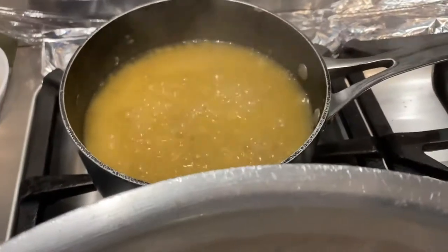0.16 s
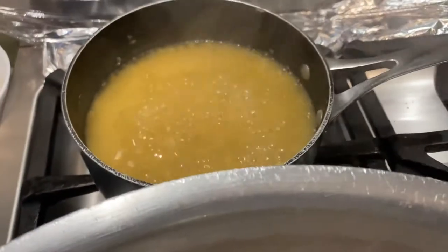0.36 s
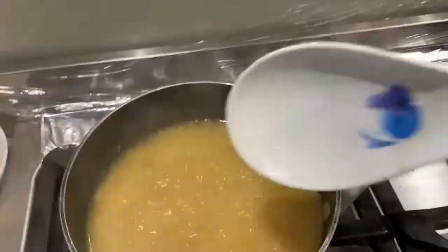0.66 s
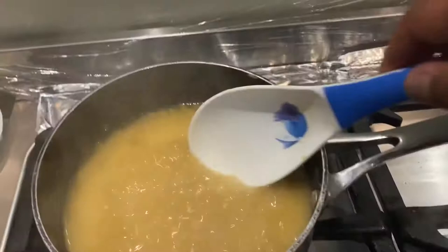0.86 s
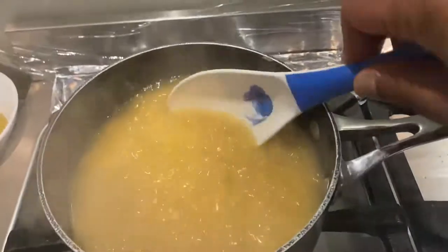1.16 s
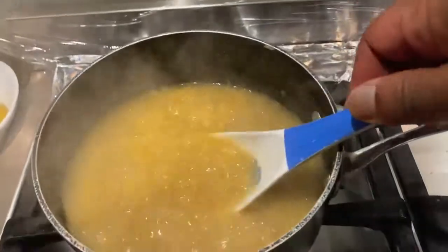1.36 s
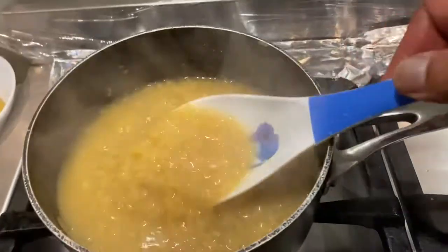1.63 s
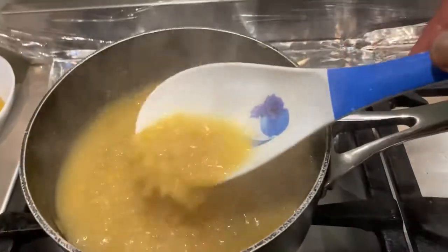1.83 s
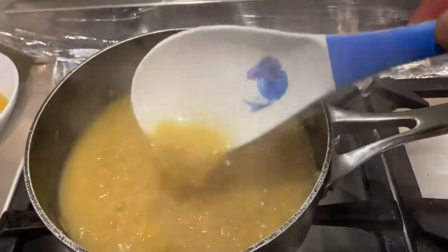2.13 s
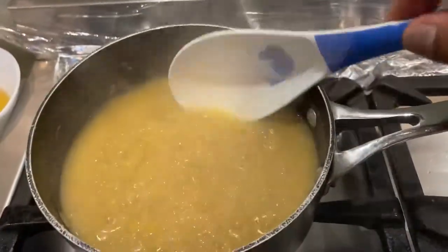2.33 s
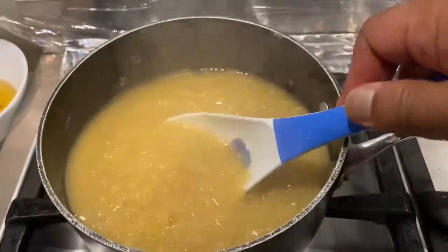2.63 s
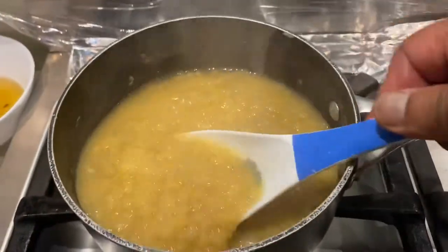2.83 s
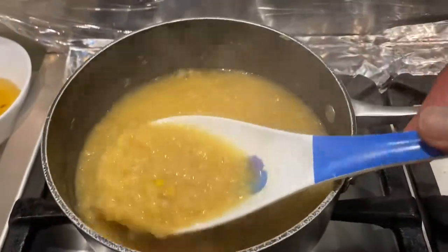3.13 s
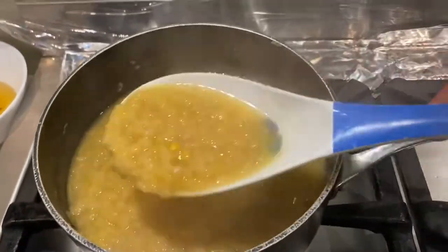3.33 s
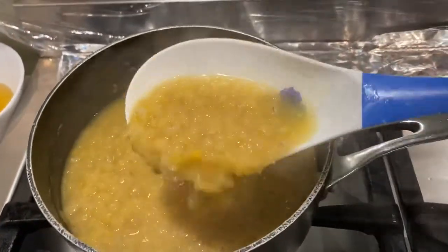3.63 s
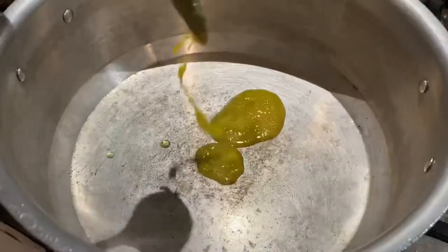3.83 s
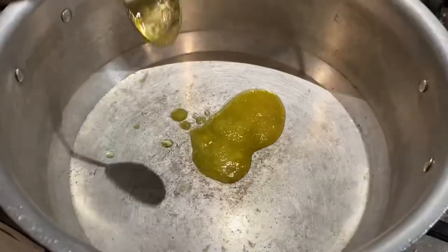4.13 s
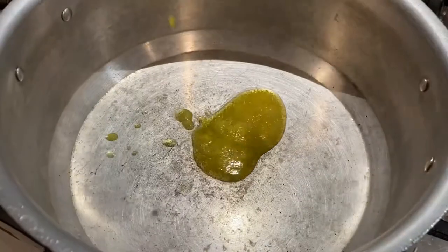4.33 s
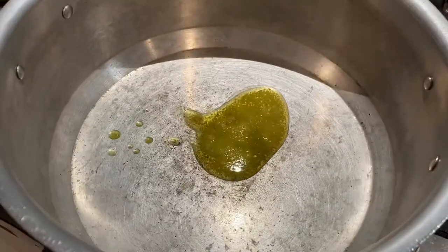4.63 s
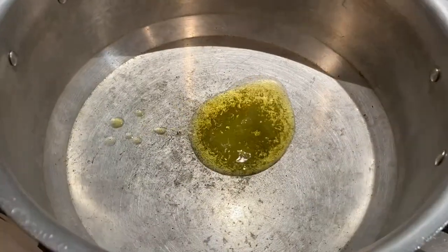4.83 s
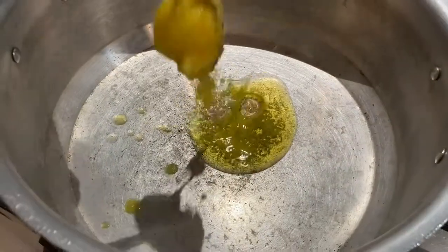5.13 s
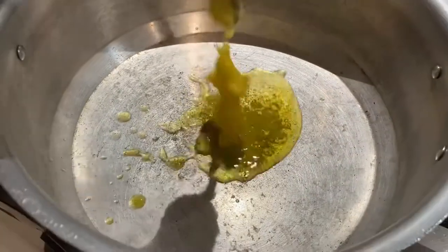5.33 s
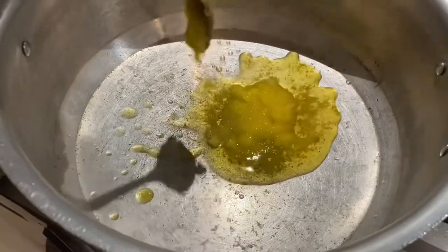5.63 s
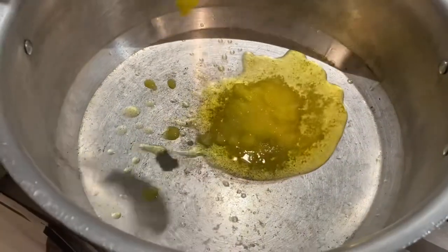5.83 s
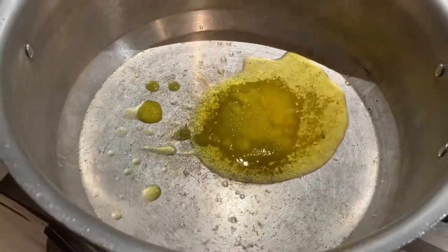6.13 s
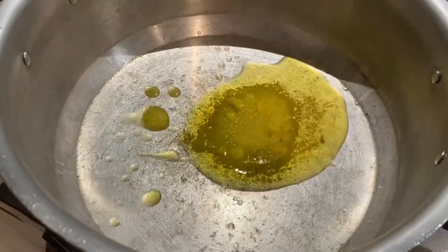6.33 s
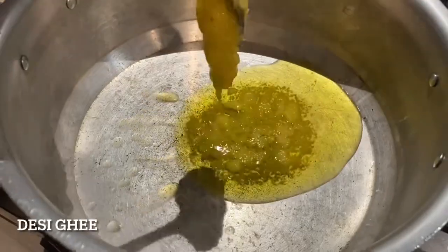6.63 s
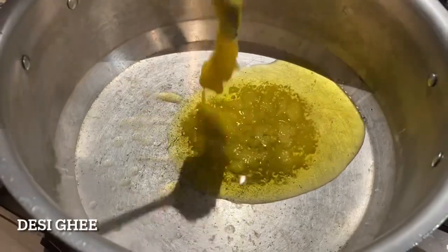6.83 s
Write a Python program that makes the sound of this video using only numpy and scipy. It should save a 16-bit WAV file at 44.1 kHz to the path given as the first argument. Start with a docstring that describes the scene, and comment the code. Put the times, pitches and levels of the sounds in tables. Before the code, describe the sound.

In a home kitchen, close up, a gas flame rumbles low beneath a faintly bubbling pot of lentils. A spoon clacks brightly on the pot, stirs with grainy strokes and short scrapes, and thick soup plops. A hard cut leads to a much drier, brighter scene: ghee melting in a steel pot, with sharp snaps, pitched pops and fine sizzle.

```python
"""In a kitchen, lentils simmer over a rumbling gas burner; a spoon knocks, stirs and scrapes, and thick soup plops.
Then a hard cut leads to a steel pot of melting ghee: dry snaps and pitched pops rattle over a fine sizzle.
Knocks and snaps are coloured impulses, bubbles are short decaying tones, and flame and room are filtered noise.
Pots answer with decaying modes and dense reflections, in two channels that are partly alike."""
import sys
import numpy as np
from scipy import signal
from scipy.fft import rfft, irfft, next_fast_len
from scipy.io import wavfile
from scipy.ndimage import uniform_filter1d

SR = 44100
rng = np.random.default_rng(int(sys.argv[2]) if len(sys.argv) > 2 else 0)


def persist_wave(psi):
    """Save psi, clipped to +-1, as 16-bit WAV."""
    counts = np.round(np.clip(psi, -1, 1) * 32767).astype(np.int16)
    wavfile.write(sys.argv[1], SR, np.atleast_2d(counts).T)


N = 307818
TIME = np.arange(N) / SR  # [s]
CUT_S = 3.747  # the lentils end and the ghee begins

# spoon knocks: (time [s], relative level [dB], contact pitch [Hz], relative pot ring [dB], low thud [dB])
KNOCKS = [(0.7606, -20, 6650, -3, -8), (0.7838, -33.5, 4500, 0, 6.5), (.797, -37.5, 4600, 3, 13),
          (1.2291, -31, 2170, -7.5, 19.5), (2.269, -23.5, 2520, -2.5, -1.5), (2.283, -32, 1730, -33, 7),
          (2.845, -34, 1720, -2.5, 14)]
# spectrum of a knock before its own contact colour: (frequency [Hz], gain [dB])
KNOCK_COLOUR = [(100, -8.5), (250, 14), (450, 4), (680, 0), (1000, -1.5), (2200, -2.5), (2750, -1),
                (3400, -11), (4150, 1), (5300, -5.5), (6050, -6.5), (7000, 0.5), (9200, 0.5), (11700, 1.5),
                (13200, -3.5), (14300, -7), (16000, -31)]
# modes of the lentil pot: (frequency [Hz], relative level [dB], T60 [s])
LENTIL_POT_MODES = [(338, -7.5, 0.77), (453, 2.5, 0.15), (955, 0, 0.26), (1032, 2, 0.23), (1226, -3.5, 0.3),
                    (1640, 1.5, 0.25), (1960, -2.5, 0.41), (2080, 5, 0.15), (2520, -6, 0.18),
                    (2850, -2.5, 0.14), (3970, -17, 0.11), (4360, -21.5, .45), (5400, -4.5, 0.34),
                    (6420, -9.5, 0.55), (6770, -6, 0.24), (7700, -11, 0.28), (12100, -7.5, .057)]


def spoon_knocks(contact_db=9, contact_octaves=0.26, dull_db=-9, ring_share=0.18):
    """Impact excitation: a short contact sets the spectrum, then the pot's modes and the kitchen answer."""
    out, t = np.zeros((2, N)), seconds(size=22050)
    hz = np.geomspace(50, SR / 2, 200)
    for s, db, pitch, ring_db, thud_db in KNOCKS:
        contact = contact_db * np.exp(-(np.log2(hz / pitch) / contact_octaves) ** 2)
        # softer contacts lack treble: a loss per octave above twice the contact pitch
        dull = dull_db * np.log2(np.maximum(hz / pitch / 2, 1))
        thud = thud_db / (1 + (hz / 1000) ** 2)

        room = colour(echoes(t, t60=0.65, db=-2.5), [(3000, 2.5), (10000, -9.0)])
        crack = echoes(t, t60=0.0019, db=7) * amp(0.69 * np.interp(SR / 4, hz, dull))
        blow = (t == 0) + crack + echoes(t, t60=0.024, db=9) + echoes(t, t60=0.075, db=4.5) + room
        blow = colour(blow, np.c_[hz, read(KNOCK_COLOUR, hz) + contact + dull + thud])

        # the contact also decides which modes it excites
        drive = ring_share * contact + 2 * dull
        struck = [(f, d + np.interp(f, hz, drive), t60) for f, d, t60 in LENTIL_POT_MODES]
        pot = unit(ring(t, struck, db=0)) * amp(ring_db - 6.5)
        add(out, s, amp(db - 19.5) * (unit(blow) + pot))
    return out


# strokes through the lentils: (time of hardest push [s], level [dB], rise [s], fall [s])
STROKES = [(1.17, -51.5, 0.013, 0.14), (1.25, -45, 0.01, 0.031), (2.39, -49.5, 0.06, 0.14),
           (2.475, -45.5, 0.0098, 0.041), (3.075, -44.5, 0.027, 0.013)]
# spectrum of the slips: (frequency [Hz], gain [dB])
STIR_COLOUR = [(150, 1.5), (350, 6), (700, -9), (1000, 2.5), (1300, -9), (1550, -5.5), (2000, -7.5),
               (3200, -21), (4800, -15), (6100, -20.5), (8000, -17), (13000, -29.5), (15500, -45)]


def stirring():
    """Stick-slip friction: lentils catch and slip under the spoon in clumps and excite the pot."""
    t = seconds(size=13230)
    body = (t == 0) + echoes(t, t60=0.09, db=1.5) + ring(t, LENTIL_POT_MODES, db=-8.0)
    slips = colour(bursts(per_s=760, spread_db=4.5) * clumps(db=3.0, size=400), STIR_COLOUR)
    return swells(STROKES) * unit(signal.fftconvolve(slips, body, axes=1)[:, :N])


# scrapes of the spoon's edge: (time of height [s], level [dB], rise [s], fall [s], pitch then [Hz], width [Hz])
SCRAPES = [(1.22, -47.5, 0.057, 0.056, 1120, 270), (1.2, -61.5, 0.048, 0.021, 6000, 1700),
           (1.2, -50.5, 0.022, 0.015, 1040, 1800), (2.378, -47, 0.007, 0.013, 1850, 220),
           (2.7, -50, 0.034, 0.033, 1290, 230)]
SCRAPE_OCTAVES_PER_S = 2.4


def scraping():
    """Friction-driven resonance: the edge's chatter feeds narrow resonances that rise as it slides."""
    out = np.zeros((2, N))
    chatter = diffuse(N) * clumps(db=2, size=250)
    for s, db, rise, fall, hz, width in SCRAPES:
        slide = np.clip(TIME - s, -2 * rise, 2 * fall)
        glide = hz * 2 ** (SCRAPE_OCTAVES_PER_S * slide)
        once = resonate(chatter, glide, width)
        out += swells([(s, db, rise, fall)]) * unit(resonate(once, glide, width))
    return out


# plops of thick soup: (time [s], peak before reflections [dB], pitch [Hz])
PLOPS = [(1.411, -49, 970), (1.809, -49, 930), (2.024, -46.5, 1060), (2.187, -48, 820), (2.468, -43, 1010),
         (2.473, -43, 390), (2.751, -42.5, 1020), (2.846, -37, 1150), (2.844, -32, 2110),
         (2.903, -38, 1060), (3.071, -40, 1820), (3.213, -32.5, 1110), (3.446, -43.5, 1840),
         (3.483, -38.5, 950), (3.484, -40, 1730), (3.597, -41, 940), (3.625, -36, 1140),
         (3.686, -42.5, 2500)]
# small bubbles ticking on the soup: (time [s], peak before reflections [dB], pitch [Hz])
TICKS = [(1.023, -41.5, 6140), (1.421, -43, 6000), (1.77, -40, 6950), (2.199, -38, 3320),
         (3.062, -42, 5960), (3.694, -38.5, 5400)]


def soup():
    """Bubble resonance: heavily damped tones, plops and ticks, reflected inside the pot."""
    plops, ticks, t = np.zeros(N), np.zeros(N), seconds(size=11025)
    for s, db, hz in PLOPS:
        add(plops, s, amp(db) * bubble(t, hz, cycles=1.0))
    for s, db, hz in TICKS:
        add(ticks, s, amp(db) * bubble(t, hz, cycles=0.37))
    plop_space = (t == 0) + echoes(t, t60=0.064, db=0) + echoes(t, t60=0.28, db=-25)
    tick_space = (t == 0) + echoes(t, t60=0.068, db=-2.5)
    plops = signal.fftconvolve(plops[None], plop_space, axes=1)
    ticks = signal.fftconvolve(ticks[None], tick_space, axes=1)
    return (plops + ticks)[:, :N]


def simmering_bubbles(db=-7.0):
    """Random superposition: faint bubbles of many pitches break in clusters on the simmering surface."""
    t = seconds(size=4410)
    starts = bursts(per_s=380, spread_db=2.5) * clumps(db=5.5, size=2000)
    breaks = bubbles(starts, np.geomspace(650, 1700, num=24), cycles=0.68)
    space = (t == 0) + echoes(t, t60=0.025, db=8.5)
    return amp(db) * simmer() * unit(signal.oaconvolve(breaks[None], space, axes=1)[:, :N])


# spectrum of the open flame: (frequency [Hz], gain [dB])
ROAR_COLOUR = [(20, -49), (40, -24), (62, -8), (78, -8.5), (97, 4), (112, -0.5), (150, 0), (190, -3),
               (214, 6), (240, -4.5), (290, -20), (420, -39), (600, -79)]
# spectrum of the flame behind the lid: (frequency [Hz], gain [dB])
LID_ROAR_COLOUR = [(20, -49), (60, -19), (100, -5), (135, 2.5), (185, 2.5), (235, -10), (320, -32.5),
                   (550, -86)]
# spectrum of gas hiss and simmering: (frequency [Hz], gain [dB])
SIMMER_COLOUR = [(190, -32.5), (330, -4), (649, -11.5), (971, -12), (1260, -15.5), (1410, -16.5),
                 (2280, -23), (2810, -24), (3150, -26), (7900, -31), (9100, -48.5), (11600, -32),
                 (14000, -42), (15000, -56.5)]
LID_S, LID_DB = 0.59, -45  # the lid leaves; flame level behind it before the stereo tilt
FLAME_DB, FLAME_DB_PER_S = -41, 1  # at half of CUT_S, before flutter and stereo tilt
FLUTTER_DB = -1  # rms size of the flutter; the sign does not matter


def burner():
    """Turbulent combustion: low filtered noise flutters under the hiss of gas and simmering soup."""
    covered = amp(LID_DB) * unit(colour(diffuse(N), LID_ROAR_COLOUR))
    flame = amp(FLAME_DB + FLAME_DB_PER_S * (TIME - CUT_S / 2)) * clumps(db=FLUTTER_DB, size=3000)
    free = flame * unit(colour(diffuse(N), ROAR_COLOUR))
    roar = (lid() * covered + (1 - lid()) * free) * amp([[1.0], [-1.0]])  # louder at left
    return roar + amp(-1.22) * simmer() * unit(colour(diffuse(N), SIMMER_COLOUR))


def lid():
    """Shielding: 1 while the lid stands in front of the burner, then a short fade to 0."""
    return np.clip((LID_S - TIME) / .02 + .5, 0, 1)


SIMMER_DB, SIMMER_DB_PER_S, LID_SHADE_DB = -56.5, 2, -5  # reference level at half of CUT_S, rise, shading


def simmer():
    """Source strength: the simmering grows steadily and is shaded by the lid."""
    return amp(SIMMER_DB + SIMMER_DB_PER_S * (TIME - CUT_S / 2) + LID_SHADE_DB * lid())


# loudest steam bubbles in the ghee: (time [s], relative level [dB], pitch [Hz], ring length [cycles])
POPS = [(3.925, -54, 11100, 5.1), (3.974, -48.5, 9600, 1.4), (4.047, -48.5, 5730, .8),
        (4.092, -42.5, 5560, 1.2), (4.121, -45.5, 7900, 0.93), (4.162, -44, 8600, 1.4),
        (4.181, -47.5, 6440, 1.6), (4.385, -43, 4200, 0.56), (4.48, -47.5, 6200, 0.46),
        (4.63, -41, 8940, 1.3), (4.672, -40.5, 4570, 0.84), (4.714, -44, 6960, 0.94),
        (4.89, -50, 4180, 0.71), (5.003, -41, 5960, 1.25), (5.064, -45.5, 4600, 0.58),
        (5.086, -46, 6800, 1.2), (5.229, -47, 7350, 1.5), (5.411, -46.5, 5100, 2.2),
        (5.586, -52, 4980, 2.2), (5.718, -35.5, 4700, 0.95), (5.756, -46, 3950, 0.61),
        (5.854, -39, 3680, 2.6), (5.985, -45.5, 5570, 1), (6.018, -45, 5500, 1.1),
        (6.093, -44.5, 5400, 1.24), (6.257, -45, 5870, 1.8), (6.268, -44.5, 4140, 0.9),
        (6.284, -43.5, 3820, 0.48), (6.298, -45.5, 6100, 0.69), (6.363, -41.5, 6700, 1.6),
        (6.468, -44, 5900, 0.83), (6.584, -37, 4190, 0.98), (6.607, -46, 6860, 1.1),
        (6.732, -39, 4780, 1.27), (6.766, -49, 7770, 2.2), (6.877, -45, 7900, 0.83),
        (6.935, -47.5, 3070, 1.1), (6.963, -43, 3870, 0.61)]
# large steam pockets that spit: (time [s], relative level [dB], overtone [dB], relative size [ratio])
SPITS = [(4.6159, -30, 9.5, 0.98), (4.844, -41, 8, 0.83), (6.162, -40.5, -25, 0.94),
         (6.178, -37.5, 3, 0.97), (6.385, -39, 0.5, 0.96)]
# hollow ring of a spit of size 1: (frequency [Hz], relative level [dB], ring length [cycles])
SPIT_MODES = [(1534, -5.5, 0.88), (1905, -3, 1.33), (2774, -1, 2.1), (447, -21.5, 0.57)]
OVERTONE_HZ = 6080
# colour of the air in the steel pot: (frequency [Hz], gain [dB])
CAVITY_COLOUR = [(200, -3), (450, -2.5), (800, -2), (1200, -12), (1500, 0), (1900, -2.5), (2300, -0.5),
                 (2950, -4.5), (3600, -1.5), (6400, -2), (16000, 7.5)]
# lesser pops: mean rate, level relative to the sizzle and its largest deviation
SMALL_POPS = dict(per_s=8, above_db=-0.5, spread_db=2)
# their usual pitch at the cut, its scatter, and its fall: bubbles grow as the pool deepens
SMALL_POP_HZ, SMALL_POP_OCTAVES, POP_SINK_OCTAVES_PER_S = 10230, 0.3, 0.2


def pops(walls, steel, crack_db=-7, scatter_db=-1, pop_direct_db=-3, spit_direct_db=-1.0,
         pop_ring_db=-2, spit_ring_db=-4, wall_db=-2):
    """Bubble and cavity resonance: each bubble cracks and rings; steel draws it out, less so for spits."""
    out, t = np.zeros((2, N)), seconds(size=4096)
    small = []
    for s, db in chance_bursts(**SMALL_POPS):
        octaves = SMALL_POP_OCTAVES * rng.standard_normal() - POP_SINK_OCTAVES_PER_S * (s - CUT_S)
        small.append((s, db, SMALL_POP_HZ * 2 ** octaves, rng.uniform(1, 1.9)))

    crack = amp(crack_db) * (t == 0)
    tones = []
    for s, db, hz, cycles in POPS + small:
        burst = bouncing(bubble(t, hz, cycles, rise=0.033) + crack)
        tones.append((s, db, pop_direct_db, pop_ring_db, burst))
    overtone = bubble(t, OVERTONE_HZ, cycles=1.2)
    for s, db, bright_db, size in SPITS:
        hollow = sum(amp(d) * bubble(t, hz / size, cycles) for hz, d, cycles in SPIT_MODES)
        burst = hollow + amp(bright_db) * overtone + crack
        tones.append((s, db, spit_direct_db, spit_ring_db, burst))

    for s, db, direct_db, ring_db, burst in tones:
        near = (t == 0) + echoes(t, t60=0.0099, db=0.5)  # first bounces differ from spot to spot
        space = amp(wall_db) * walls + amp(ring_db) * steel
        add(space, 0, amp(direct_db) * near + echoes(t, t60=0.051, db=scatter_db))
        add(out, s, amp(db - 12.5) * unit(signal.fftconvolve(burst[None], space, axes=1)))
    return colour(out * amp([[1.4], [-1.4]]), CAVITY_COLOUR)  # louder at left


# paths between the steel walls: mean time, spread as a share, first bounce, change per trip
ACROSS_S, ACROSS_SPREAD, FIRST_BOUNCE_DB, BOUNCE_DB = .0017, 0.55, -5, -1.5


def bouncing(x):
    """Multiple reflection: a burst crosses the pot on uneven paths, which roughens its decay."""
    out, draws = x.copy(), rng.uniform(-1, 1, size=(12, 2))
    times = np.cumsum(abs(ACROSS_S * (1 + ACROSS_SPREAD * draws[:, 0])))
    for trip, s in enumerate(times):
        add(out, s, np.sign(draws[trip, 1]) * amp(FIRST_BOUNCE_DB + BOUNCE_DB * trip) * x)
    return out


# loudest dry snaps of bursting droplets: (time [s], relative level [dB])
SNAPS = [(3.859, -38.5), (3.885, -40), (4.002, -36), (4.161, -32.5), (4.324, -33), (4.331, -31),
         (4.344, -39.5), (4.452, -30), (4.6, -35), (4.949, -37.5), (5.246, -27.5), (5.269, -32.5),
         (5.375, -47), (5.427, -31), (5.46, -28.5), (5.492, -27.5), (5.608, -30), (5.719, -31),
         (5.754, -34), (5.846, -29), (5.872, -25), (6.037, -34), (6.192, -28.5), (6.421, -30),
         (6.427, -27.5), (6.922, -38.5)]
# spectrum shared by the snaps: (frequency [Hz], gain [dB])
SNAP_COLOUR = [(200, -17), (1100, -16.5), (1600, -12.5), (3000, -7.5), (6500, -1), (11000, 2.5),
               (15300, 0.5), (16500, -11)]
# lesser snaps: mean rate, level relative to the sizzle and its largest deviation
SMALL_SNAPS = dict(per_s=18, above_db=10.2, spread_db=2.7)
# bright band of each snap: height, width (also the scatter of its pitch), usual pitch
SNAP_PEAK_DB, SNAP_PEAK_OCTAVES, SNAP_HZ = 3, 0.23, 8330


def snaps(steel):
    """Impulsive radiation: droplets burst as brief coloured noise and set the steel ringing faintly."""
    clicks, t = np.zeros(N), seconds(size=64)
    hz = np.fft.rfftfreq(len(t), 1 / SR) + 1
    for s, db in SNAPS + chance_bursts(**SMALL_SNAPS):
        pitch = SNAP_HZ * 2 ** (SNAP_PEAK_OCTAVES * rng.standard_normal())
        band = amp(SNAP_PEAK_DB * np.exp(-(np.log2(hz / pitch) / SNAP_PEAK_OCTAVES) ** 2))
        burst = irfft(rfft(rng.standard_normal(len(t))) * band) * amp(-60 * t / 0.0016)
        add(clicks, s, amp(db + 16.5) * burst / np.linalg.norm(burst))
    t = seconds(size=13230)
    space = (t == 0) + echoes(t, t60=0.018, db=-4) + amp(-5.0) * steel
    return signal.fftconvolve(colour(clicks, SNAP_COLOUR), space, axes=1)[:, :N]


# the sizzle flares as water in the ghee meets the steel:
# (time of height [s], relative level [dB], rise [s], fall [s])
FLARES = [(3.95, -54, 0.079, 0.63), (4.36, -53, 0.078, 0.084), (4.72, -49.5, 0.12, 0.15),
          (5.4, -49, 0.41, 0.86), (6.3, -58.5, 0.058, 1.0)]
# spectrum of the dry bursts: (frequency [Hz], gain [dB])
SIZZLE_COLOUR = [(300, -4), (1200, -28), (1700, -8), (2300, -4.5), (3300, -2), (6500, 2), (11500, 3.5),
                 (15500, 0), (16500, -37)]


def sizzle(steel, fizz_db=-1):
    """Random superposition: clustered dry bursts and tiny ringing bubbles are blurred by the pot."""
    cluster, t = clumps(db=3.0, size=1800), seconds(size=13230)
    dry_bursts = unit(colour(bursts(per_s=200, spread_db=2.0) * cluster, SIZZLE_COLOUR))
    starts = bursts(per_s=200, spread_db=11.5) * cluster
    fizz = unit(bubbles(starts, np.geomspace(5000, 14000, num=30), cycles=0.91))
    space = (t == 0) + echoes(t, t60=0.023, db=-4) + amp(-7.0) * steel
    blurred = signal.oaconvolve(dry_bursts + amp(fizz_db) * fizz, space, axes=1)[:, :N]
    return amp(-1.0) * swells(FLARES) * unit(blurred)


def chance_bursts(per_s, above_db, spread_db):
    """Jittered point process: rows of (time [s], level [dB]) in the ghee that follow the sizzle's level."""
    draws, sizzling = rng.random((120, 2)), swells(FLARES)
    times = CUT_S + (np.arange(len(draws)) + draws[:, 0]) / per_s
    sizes = above_db + spread_db * (2 * draws[:, 1] - 1)
    return [(s, db + 20 * np.log10(sizzling[int(s * SR)] + 1e-9))
            for s, db in zip(times, sizes) if s < TIME[-1]]


# a soft lump settles on the hot steel and sputters: (time of height [s], level [dB], rise [s], fall [s])
SPUTTERS = [(5.18, -60.5, 0.077, 0.092), (5.6, -67, 0.7, 0.3), (6.88, -60.5, 0.071, 0.036)]
# spectrum of the puffs: (frequency [Hz], gain [dB])
SPUTTER_COLOUR = [(150, -21), (300, -12), (430, 0.5), (580, -10), (690, -0.5), (780, -9), (865, -12),
                  (1050, -12.5), (1700, -9), (3000, -7.5), (6000, -36)]


def sputter():
    """Pulsed flow: steam trapped under the soft lump escapes in dull, uneven puffs."""
    puffs = colour(bursts(per_s=160, spread_db=5.0) * clumps(db=1.5, size=900), SPUTTER_COLOUR)
    space = echoes(seconds(size=8820), t60=0.056, db=0)
    return swells(SPUTTERS) * unit(signal.fftconvolve(puffs, space, axes=1)[:, :N])


# larger bubbles in the soft ghee: (time [s], peak before reflections [dB], pitch [Hz])
BLUBS = [(3.857, -53.5, 460), (4.951, -62, 686), (5.138, -64, 430), (5.184, -56, 458), (5.311, -56.5, 450),
         (6.864, -66, 436)]


def blubs():
    """Bubble resonance: larger bubbles break with a low note that the pot's reflections hold briefly."""
    out, t = np.zeros(N), seconds(size=8820)
    for s, db, hz in BLUBS:
        add(out, s, amp(db) * bubble(t, hz, cycles=1.0, rise=0.044))
    space = (t == 0) + echoes(t, t60=0.074, db=-2)
    return signal.fftconvolve(out[None], space, axes=1)[:, :N]


# spectrum of the kitchen background: (frequency [Hz], gain [dB])
KITCHEN_COLOUR = [(20, -15), (75, 8.5), (200, -4.5), (320, -7), (430, -1), (570, -11.5), (750, -5.5),
                  (1050, -9.5), (2500, -13.5), (6000, -19.5)]
KITCHEN_DB = -68.5


def kitchen():
    """Diffuse background field: low steady noise of the room and a small flame."""
    return amp(KITCHEN_DB) * unit(colour(diffuse(N), KITCHEN_COLOUR))


def bubble(t, hz, cycles, rise=0):
    """Damped oscillator: a gas pocket swells and rings down; its pitch may rise by a share as it opens."""
    u = t * hz / cycles
    return u * np.exp(1 - u) * np.sin(2 * np.pi * hz * t * (1 + rise * np.tanh(u / 2) - rise / 2))


def bubbles(clicks, pitches, cycles):
    """Superposition: every click starts a bubble of one of the given pitches."""
    out, t = np.zeros(N), seconds(size=600)
    shapes = [unit(bubble(t, hz, cycles)) for hz in pitches]
    pick = rng.integers(0, len(pitches), N)
    for at in np.flatnonzero(clicks):
        add(out, at / SR, clicks[at] * shapes[pick[at]])
    return out


def bursts(per_s, spread_db):
    """Random point process: clicks of either sign, a few much larger than the rest."""
    chance, size = rng.random(N), rng.standard_exponential(N)
    at, out = np.flatnonzero(chance < per_s / SR), np.zeros(N)
    out[at] = (-1.0) ** at * amp(spread_db * np.minimum(size[at], 3.5))
    return out


def clumps(db, size):
    """Slow random modulation: a gain that gathers sound into clusters about size samples long."""
    smooth = uniform_filter1d(uniform_filter1d(rng.standard_normal(N), size), size // 2)
    return amp(db * unit(smooth))


def swells(rows):
    """Power addition: rounded swells from rows of (time [s], level [dB], rise [s], fall [s])."""
    power = 0
    for s, db, rise, fall in rows:
        width = np.where(TIME < s, rise, fall)
        power = power + amp(db) ** 2 * np.exp(-2 * ((TIME - s) / width) ** 2)
    return np.sqrt(power)


# side partials of a mode: mean distance of the outer pair at 1 kHz, and their level
SPLIT_HZ, SPLIT_DB = 29.2, -8


def ring(t, modes, db):
    """Modal decay: a pot's modes, each split into close partials that beat, with a total energy of db."""
    tone = np.zeros((2, len(t)))
    for hz, d, t60 in modes:
        for side in np.linspace(-1, 1, num=5):
            partial = hz + side * SPLIT_HZ * (hz / 1000) ** .5 * (.5 + rng.random())
            cycles = partial * t + rng.random() + rng.random((2, 1)) / np.pi
            tone += amp(d + SPLIT_DB * abs(side) - 60 * t / t60) * np.sin(2 * np.pi * cycles)
    return amp(db) * unit(tone) / np.sqrt(len(t))


def echoes(t, t60, db):
    """Reverberant decay: dense dying reflections with a total energy of db."""
    tail = diffuse(len(t)) * amp(-60 * t / t60) * (1 - np.exp(-t / .0005))
    return amp(db) * unit(tail) / np.sqrt(len(t))


def resonate(x, hz, width):
    """Heterodyne resonance: a one-pole low-pass, shifted in frequency, follows the curve hz."""
    turn = np.exp(2j * np.pi * np.cumsum(hz * np.ones(N)) / SR)
    r = np.exp(-np.pi * width / SR)
    return 2 * (turn * signal.lfilter([1 - r], [1, -r], x / turn)).real


def colour(x, points):
    """Minimum-phase filtering: a causal filter with the given spectrum."""
    size = 8192
    gain_db = np.maximum(read(points, abs(np.fft.fftfreq(size, 1 / SR))), -100)
    log_gain = np.log(amp(gain_db))
    taps = np.fft.ifft(np.exp(np.conj(signal.hilbert(log_gain)))).real[:size // 2]
    return signal.oaconvolve(np.atleast_2d(x), taps[None], axes=1)[:, :x.shape[-1]]


# likeness of the two channels of diffuse sound: (frequency [Hz], correlation [ratio])
LIKENESS = [(60, 0.99), (200, 0.94), (450, 0.64), (900, 0.15), (2500, 0.31), (5500, 0.97), (7000, 1),
            (16000, 1)]


def diffuse(size):
    """Interchannel coherence: stereo noise whose channels are alike by an amount that varies with frequency."""
    a, b = rfft(rng.standard_normal((2, size)))
    same = np.clip(read(LIKENESS, np.fft.rfftfreq(size, 1 / SR)), -1, 1)
    return irfft(np.array([a, same * a + np.sqrt(1 - same ** 2) * b]), size)


def shift_phase(x, phase):
    """Interchannel phase: left and right are out of step, by an amount that varies with frequency."""
    size = next_fast_len(N + 4096)
    turn = np.exp(.5j * read(phase, np.fft.rfftfreq(size, 1 / SR)))
    return irfft(rfft(x, size) * np.array([turn, 1 / turn]), size)[:, :N]


def amp(db):
    """Logarithmic level: decibels to gain."""
    return 10 ** (np.asarray(db) / 20)


def unit(x):
    """Root-mean-square normalisation: scales to rms 1."""
    return x / np.sqrt(np.mean(x ** 2) + 1e-20)


def read(points, hz):
    """Logarithmic frequency scale: interpolates a table along it."""
    f, value = np.transpose(points)
    return np.interp(np.log(hz + 1), np.log(f + 1), value)


def add(mix, s, sound):
    """Linear superposition: mixes a sound in at time s."""
    part = mix[..., round(s * SR):][..., :sound.shape[-1]]
    part += sound[..., :part.shape[-1]]


def seconds(size):
    """Uniform sampling: time axis of a short sound."""
    return np.arange(size) / SR


# phase of the left channel relative to the right, lentil pot: (frequency [Hz], phase [rad])
LENTIL_PHASE = [(20, -0.5), (430, 0.73), (780, -0.72), (2150, 1), (5860, -1.6), (6800, 1.35), (8350, 2.5),
                (10200, 4.5), (11200, 7.5), (13300, 7), (14700, 10.5)]
# phase of the left channel relative to the right, ghee pot: (frequency [Hz], phase [rad])
GHEE_PHASE = [(20, 0.5), (6500, 1), (7700, 0.1), (8900, -3.5), (11200, -6), (13200, -9.5), (15000, -11.5)]
# modes of the steel pot: (frequency [Hz], relative level [dB], T60 [s])
STEEL_MODES = [(1492, 0, 0.18), (1720, 2.5, 0.37), (2750, -9.5, 0.69), (3030, 6, 0.19), (3295, -2, 0.22),
               (3450, 0.5, 0.21), (3732, 3, 0.091), (4010, -8, 0.34), (4090, -1, 0.28), (4440, -4, 0.36),
               (4880, -6.5, 0.48), (5800, -2, 0.26), (6600, -13, 0.088), (6970, 3, 0.16)]
# the level dips briefly: (time [s], depth [dB], half-width [s])
DIPS = [(0.544, -18.5, 0.012), (4.853, -19.5, 0.018), (6.446, -20.5, 0.016)]


def scene():
    """Superposition of sources: the lentil pot, then a hard cut to the ghee pot."""
    lentils = burner() + simmering_bubbles() + stirring() + scraping() + spoon_knocks() + soup()
    lentils = shift_phase(lentils, LENTIL_PHASE)

    t = seconds(size=13230)
    walls, steel = echoes(t, t60=0.13, db=-4.0), ring(t, STEEL_MODES, db=-5.5)  # shared by the bursts
    ghee = pops(walls, steel) + snaps(walls + steel) + sizzle(walls + steel)
    ghee = shift_phase(ghee + sputter() + blubs() + kitchen(), GHEE_PHASE)

    after = np.clip((TIME - CUT_S) / .005 + .5, 0, 1)
    dips = amp(sum(db * np.exp(-((TIME - s) / width) ** 2) for s, db, width in DIPS))
    return dips * ((1 - after) * lentils + after * ghee)


EDGE_HZ = 16100


def record(dry):
    """Band limitation: a steep linear-phase low-pass removes the highest treble."""
    taps = signal.firwin(511, EDGE_HZ, window=("kaiser", 9), fs=SR)
    return signal.oaconvolve(dry, taps[None], "same")


dry = scene()
out = record(dry)
persist_wave(out)
```